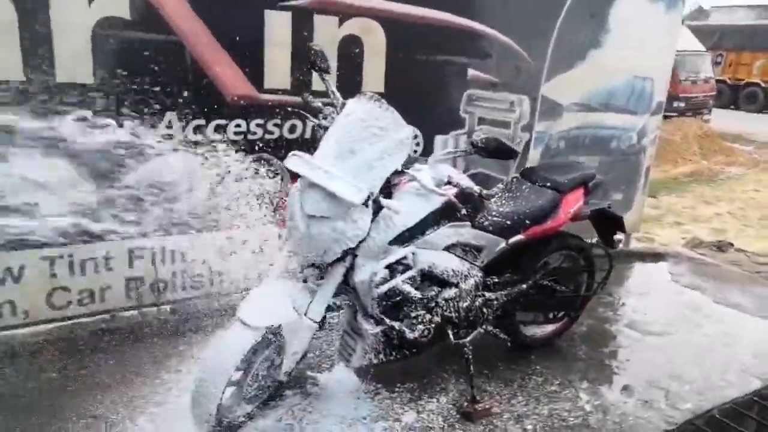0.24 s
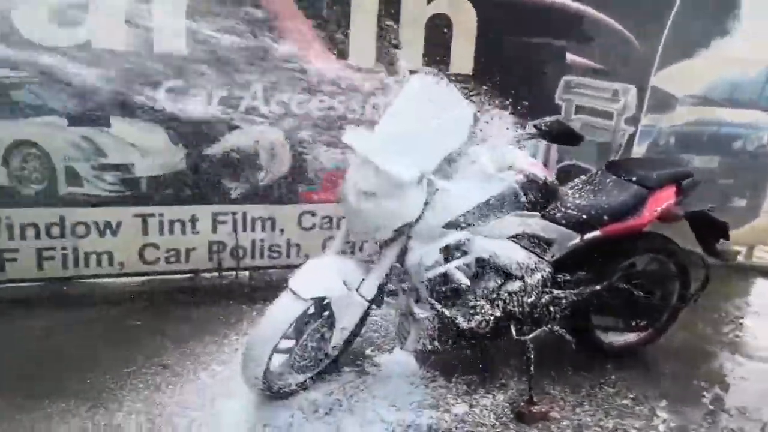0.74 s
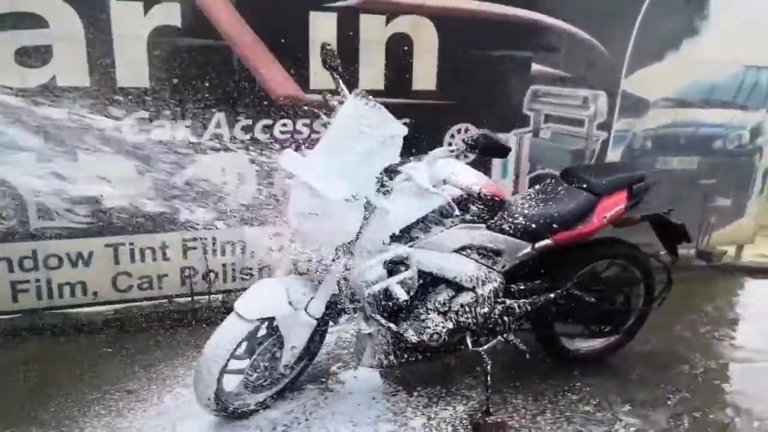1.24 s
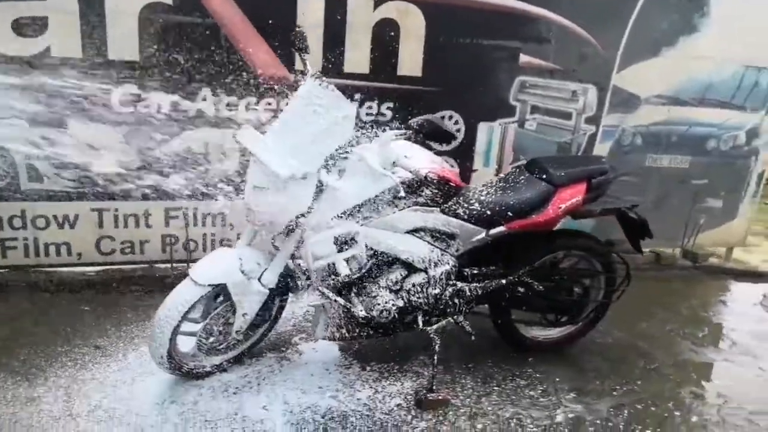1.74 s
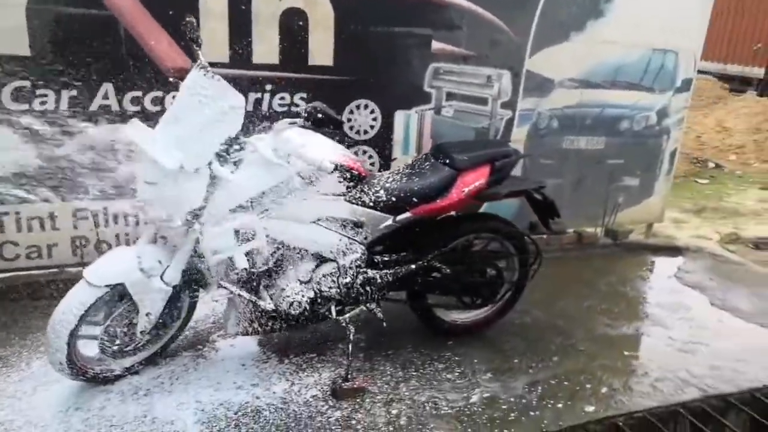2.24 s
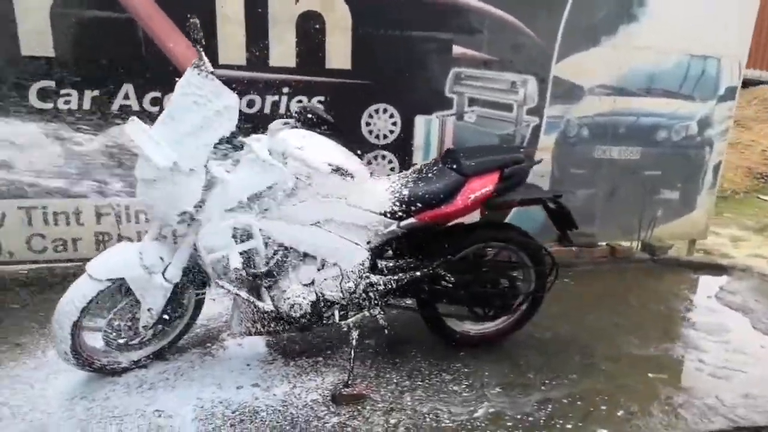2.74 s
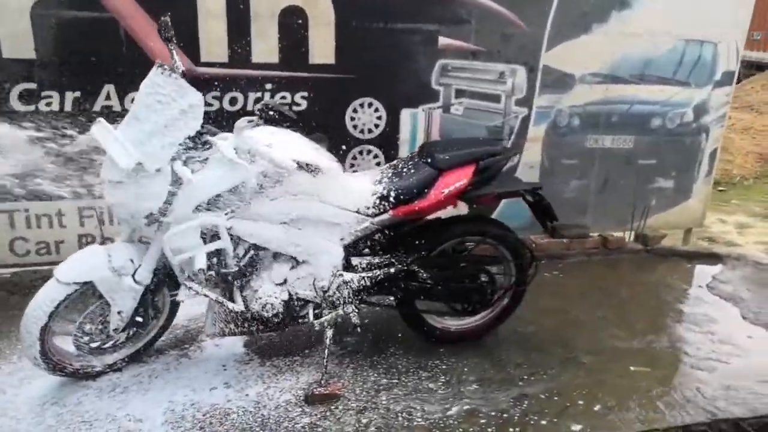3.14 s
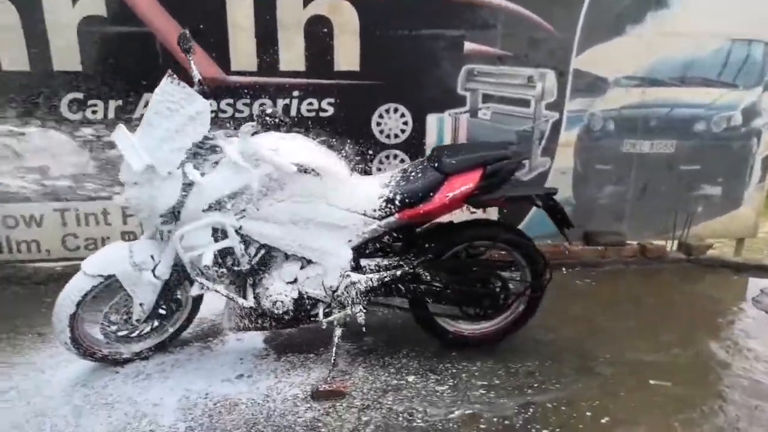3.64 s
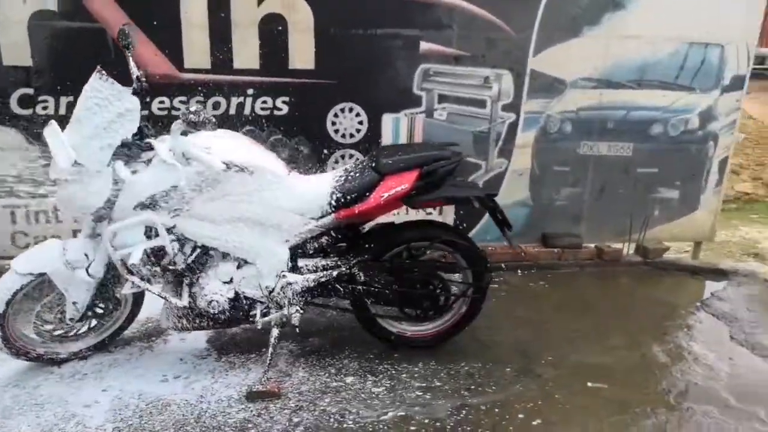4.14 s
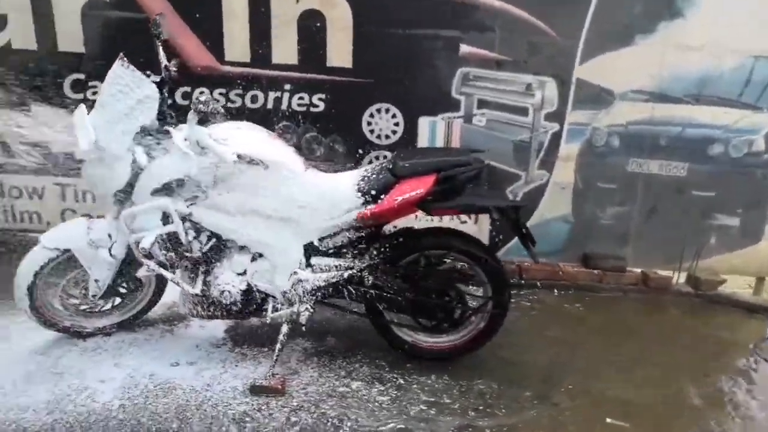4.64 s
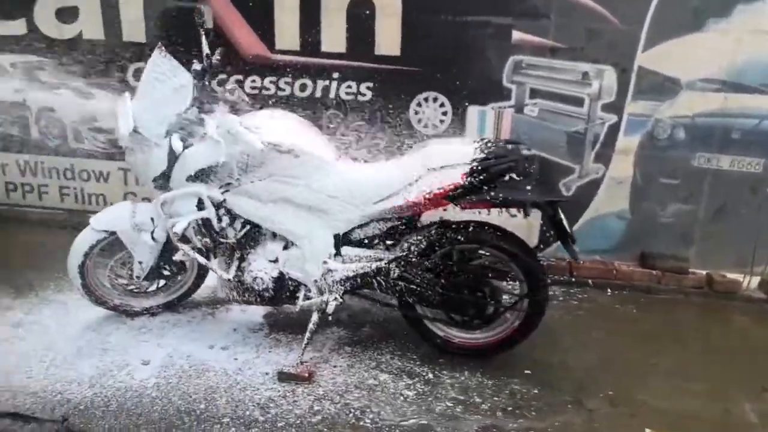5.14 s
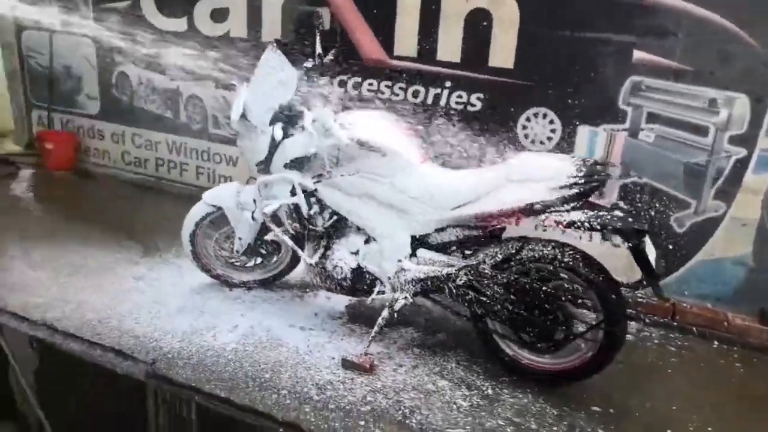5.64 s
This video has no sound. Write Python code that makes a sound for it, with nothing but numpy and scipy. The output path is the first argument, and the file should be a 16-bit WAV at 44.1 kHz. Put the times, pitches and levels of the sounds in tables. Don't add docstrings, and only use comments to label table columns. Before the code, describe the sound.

Close hand-held stereo capture of a pressurised foam jet outdoors beside a road. Steady noisy hiss and airy whistle start at full strength, with a dull knock on the phone almost immediately. The sound swings left at one second as the phone turns. Low engine hums and a thin brake squeal pass behind, then the spray eases, coloured by short echoes from wet ground, bodywork and wall, with crisp fizz drifting past.

```python
import sys
import numpy as np
from scipy import signal
from scipy.fft import rfft, irfft
from scipy.io import wavfile
from scipy.ndimage import uniform_filter1d, map_coordinates

SR = 44100
rng = np.random.default_rng(int(sys.argv[2]) if len(sys.argv) > 2 else 0)


def elevation(decibels):
    levels = np.asarray(decibels, float)
    return 10 ** (levels / 20)


def dump(signal):
    limited = np.clip(np.atleast_2d(signal).T, -1, 1)
    pcm = np.round(limited * 32767).astype(np.int16)
    wavfile.write(sys.argv[1], SR, pcm)


N = 260190
HZ, T = np.arange(N // 2 + 1) * SR / N, np.arange(N) / SR


def curve(points, hz):
    f, db = np.transpose(points)
    return np.interp(np.log(hz + 1), np.log(f), db)


def along(table):
    s, *columns = np.transpose(table)
    return [np.interp(T, s, c) for c in columns]


def unit(x):
    return x / np.sqrt(np.mean(x ** 2))


def smooth_twice(x, k):
    return uniform_filter1d(uniform_filter1d(x, k), k)


def walk(rate):
    k = int(SR / rate)
    held = np.repeat(rng.standard_normal(N // k + 1), k)
    return 0.62 * smooth_twice(held, k)[:N]


def late(x, ms):
    return map_coordinates(x, [np.arange(N) - ms * SR / 1000], order=3, mode="grid-wrap")


def bands(spectrum, centres):
    place = np.interp(np.log(HZ + 1), np.log(centres), np.arange(len(centres)))
    return [irfft(spectrum * np.clip(1 - abs(place - k), 0, 1), N) for k in range(len(centres))]


def notes(table, edge, steady, spread):
    out = np.zeros(N)
    for t0, t1, hz0, hz1, db in table:
        on = (T > t0) & (T < t1)
        k = int(SR / (spread * hz0) / 2)
        wobble = smooth_twice(rng.standard_normal((2, N)), k)
        wobble = steady + unit(wobble[0])[on] + 1j * unit(wobble[1])[on]
        glide = np.interp(T[on], [t0, t1], [hz0, hz1])
        carrier = np.exp(2j * np.pi * np.cumsum(glide) / SR)
        swell = np.clip(np.minimum(T[on] - t0, t1 - T[on]) / (edge * (t1 - t0)), 0, 1)
        out[on] += elevation(db) * swell * (wobble * carrier).real / np.sqrt(1 + steady ** 2 / 2)
    return out


# f/Hz, level/dB
TRAFFIC_COLOUR = [(12, -36), (20, -10), (60, -0.5), (135, -0.5), (285, -7), (479, -15.5), (520, -21),
                  (680, -29), (1140, -120)]


def rumble():
    mid, side = rfft(rng.standard_normal((2, N))) * elevation(curve(TRAFFIC_COLOUR, HZ)) * (HZ < 1500)
    side = side * np.clip(HZ / 560, .08, 1)
    centres = 25 * 2 ** np.arange(0, 5.5, .5)
    out = np.zeros((2, N))
    for m, d in zip(bands(mid, centres), bands(side, centres)):
        out += (m + d * np.array([[1], [-1]])) * elevation(2.5 * walk(2.6))
    return elevation(-37.5) * unit(out)


# start t/s, end t/s, start f/Hz, end f/Hz, level/dB
ENGINE_HUMS = [(.3, 1.35, 45.4, 43.8, -42), (.8, 1.4, 131, 145, -40), (.85, 1.2, 63, 68, -41),
               (1.42, 1.92, 71, 79, -37), (1.7, 2.1, 129, 128, -43), (.3, .8, 136, 133, -47),
               (.3, .75, 64, 68, -48), (2.05, 2.6, 105, 111, -40), (2.35, 2.9, 84, 87, -36.5),
               (2.3, 2.8, 135, 150, -45), (2.7, 3.2, 160, 145, -42), (2.95, 3.3, 76, 70, -40),
               (3.4, 3.75, 66, 58, -40), (4.3, 5.2, 50, 50.5, -44), (4.9, 5.7, 165, 143, -47),
               (1.0, 2.1, 295, 293, -51)]


def engines():
    return notes(ENGINE_HUMS, edge=0.2, steady=3.5, spread=.04)


# start t/s, end t/s, start f/Hz, end f/Hz, level/dB
BRAKE_SQUEALS = [
    (1.18, 1.45, 3980, 3950, -37),
    (1.75, 2.0, 3900, 4000, -37),
    (1.5, 1.9, 3735, 3725, -36),
    (1.8, 2.42, 3715, 3700, -28),
    (1.47, 1.52, 7000, 6980, -43),
    (1.74, 1.79, 7090, 7100, -44),
    (2.1, 2.3, 6980, 7050, -41),
]


def brake():
    squeal = notes(BRAKE_SQUEALS, edge=0.22, steady=0.7, spread=.013)
    return np.array([squeal, elevation(5.5) * late(squeal, 0.471)])


# onset t/s, rise t/s, fall t/s, peak level/dB
HAND_KNOCK = (.1522, .0018, .0027, -9.5)


def knock():
    t0, rise, fall, db = HAND_KNOCK
    ramp = np.clip((T - t0) / rise, 0, 1) ** 2
    release = np.exp(-(np.maximum(T - t0 - rise, 0) / fall) ** 1.1)
    push = signal.lfilter(*signal.butter(1, 9, "high", fs=SR), elevation(db) * ramp * release)
    return np.array([push, signal.lfilter(*signal.butter(1, 700, fs=SR), late(push, .25))])


# f/Hz, level/dB
MIST_SPECTRUM = [(6500, -5.5), (8180, -4.5), (8450, -3.5), (9600, -5.5), (10200, -10), (12000, -14.5),
                 (13500, -22), (15000, -24)]
# f/Hz, level/dB
MIST_RIGHT_SHADE = [(7500, 6.5), (8400, -14.5), (9700, -30), (11500, -18), (14500, -6)]
# middle t/s, half length t/s, right port level/dB, gain at the left level/dB
MIST_CLOUDS = [(0.02, 0.28, -54, -4), (.7, 0.53, -42.5, -0.5), (1.103, 0.17, -43, 1.5),
               (1.38, 0.16, -57, 1.5), (3.2, 0.37, -50, 0.5), (3.6, 0.44, -56, 0.5),
               (4.302, 0.22, -59, 3.5), (4.582, 0.15, -44, 2), (4.7, 0.17, -40, 3), (4.88, 0.16, -57, -1),
               (5.413, 0.35, -39.5, 1.5), (5.73, 0.32, -49, 0.5)]


def mist():
    left_db, right_floor_db = -44.5, -66
    cloud_edge = 0.42
    pops = rng.standard_normal((2, N)) * elevation(1.9 * rng.exponential(size=(2, N)))
    shade_db = np.array([0 * HZ, curve(MIST_RIGHT_SHADE, HZ)])
    spectrum = rfft(pops) * elevation(curve(MIST_SPECTRUM, HZ) + shade_db) * (HZ > 5000)
    centres = 6500 * 2 ** np.arange(0, 1.4, .2)
    fizz = sum(band * elevation(1.3 * walk(4.9)) for band in bands(spectrum, centres))
    gain_db = np.array([left_db + 0 * T, right_floor_db + 0 * T])
    for middle, length, right_db, left_gain_db in MIST_CLOUDS:
        passing = np.clip((1 - abs(T - middle) / length) / cloud_edge, 0, 1)
        gain_db[0] += left_gain_db * passing
        gain_db[1] = np.maximum(gain_db[1], right_floor_db + (right_db - right_floor_db) * passing)
    return unit(fizz) * elevation(gain_db + 3.0 + 0.58 * walk(33))


# f/Hz, level per Hz/dB
JET_SPECTRUM = [(500, -30.5), (620, -29), (800, -19.5), (1400, -22.5), (1650, -13), (2100, -14.5),
                (2600, -14.5), (3150, -19), (4000, -13), (4600, -15), (5300, -18), (6000, -25.5),
                (6350, -32), (7100, -27)]
# f/Hz, width f/Hz, level/dB
CHAMBER_MODES = [
    (1893, 180, 13),
    (611, 97, 6),
    (3950, 176, -5),
]


def turbulence():
    ring = 1 + sum(elevation(db) / (1 + (2 * (HZ - hz) / width) ** 2) for hz, width, db in CHAMBER_MODES)
    octaves_above = np.log2(np.maximum(HZ / JET_SPECTRUM[-1][0], 1))
    fall_db = -97 * octaves_above
    colour = elevation(curve(JET_SPECTRUM, HZ) + fall_db) * ring * np.clip(HZ / 480, 0, 1) ** 4
    colour = colour / np.sqrt(np.mean(colour ** 2))
    return rfft(rng.standard_normal((3, N))) * colour


# start t/s, end t/s, nearest delay/ms, further at the ends/ms, share (0-1)
FAIRING_PASS = (2, 4.7, 1.704, 0.23, 0.63)
# t/s, delay/ms, share (0-1)
HAND_ECHO = [(0, .27, .5), (.5, .21, .55), (.9, .172, .7), (1.2, .17, .4), (1.5, .3, .05), (2.4, .3, .3),
             (4.1, .24, .4), (4.8, .235, .35), (5.9, .24, .25)]


def surfaces(ground_ms):
    t0, t1, near_ms, far_ms, share = FAIRING_PASS
    facing = np.clip(1 - ((2 * T - t0 - t1) / (t1 - t0)) ** 2, 0, 1)
    ground_seen = np.clip((T - 1.05) / .4 + .5, 0, 1)
    tank_share = 0.18 * np.clip(1 - T / 7.1, 0, 1)
    left = [(1.2 * ground_ms, .4 * ground_seen),
            (ground_ms + 0.29, tank_share),
            (near_ms + far_ms * (1 - facing), share * facing)]
    ground_share = .38 * (1.1 - .07 * T) * ground_ms / .6
    return left, [(ground_ms, ground_share), along(HAND_ECHO)]


def glints(x, echoes, strength):
    return strength * sum(share * late(x, ms) for ms, share in echoes)


def bend(x, lag):
    long_waves = irfft(rfft(x) / (1 + (HZ / 2500) ** 8), N)
    side_on_ms, bent_share = .45, .55
    long_lag = lag + bent_share * np.maximum(side_on_ms - lag, 0)
    return late(x - long_waves, lag) + late(long_waves, long_lag)


# t/s, ground echo delay/ms, right port lag/ms
LANCE_POSE = [(0, 1.05, .5), (.45, .87, .445), (.8, .71, .44), (1.05, .52, .44), (1.9, .66, .455),
              (2.4, .62, .46), (3.0, .65, .45), (3.6, .58, .47), (4.4, .44, .49), (4.8, .46, .475),
              (5.1, .55, .39), (5.4, .7, .345), (5.9, .8, .29)]
# f/Hz, width f/Hz, level/dB
BEAM = (1800, 600, -5)


def arrivals():
    straight, left_wet, right_wet = turbulence()
    straight = irfft(straight, N)
    ground_ms, lag = along(LANCE_POSE)
    left_echoes, right_echoes = surfaces(ground_ms)
    wall_ms = np.maximum(6.7 - .4 * T, 4.9)
    wall_share = np.clip(.05 + .11 * T, .15, .5)
    bright = straight - .5 * late(straight, .11)
    walled = straight + wall_share * late(straight, wall_ms)
    left = walled + glints(bright, left_echoes, strength=.65)
    right = bend(walled + glints(bright, right_echoes, strength=1.0), lag)
    hz, width, db = BEAM
    beam_db = db / (1 + (2 * (HZ - hz) / width) ** 4)
    scatter = elevation(2.5 * np.log2(HZ / 2000 + .1) + beam_db)
    wet = elevation(-8.5 + .9 * T)
    return left + wet * irfft(left_wet * scatter, N), right + wet * irfft(right_wet * scatter, N)


# t/s, whistle level/dB, hiss left minus right level/dB (turn of the phone)
LANCE_PATH = [(0, -20.5, -2.5), (.25, -18.5, 0.5), (.5, -18.5, -2), (.8, -19.5, 1), (1.0, -21.5, 8.5),
              (1.25, -20, 2.5), (1.6, -21, 5), (2.2, -22.5, 3), (2.9, -22.5, 1), (3.4, -24.5, -0.5),
              (4.0, -25, 0), (4.6, -25.5, -2), (5.0, -26, -3.5), (5.45, -26, -1.5), (5.9, -26.5, -4.5)]
# f/Hz, level/dB
RIGHT_PORT_RESPONSE = [(400, 2), (620, -1), (800, -2), (1150, 2), (1900, 7), (2300, 13.5), (2700, 6.5),
                       (3450, 2), (4000, 0), (5200, 2), (6000, 6), (7200, -1.5)]
# f/Hz, lead/rad
RIGHT_PORT_PHASE = [(500, -.9), (860, -.1), (1300, .4), (2050, .65), (2350, -.3), (2600, -.7), (3450, -1.0),
                    (4200, 0)]


def jet():
    whistle_db, hiss_pan_db = along(LANCE_PATH)
    nearness_db = whistle_db + 22
    hiss_db, roar_db = -26.5 + 0.47 * nearness_db, -44.5 + 0.74 * nearness_db
    pan_db = hiss_pan_db + 3 + 1.32 * T
    left, right = arrivals()
    port = elevation(curve(RIGHT_PORT_RESPONSE, HZ)) * np.exp(1j * curve(RIGHT_PORT_PHASE, HZ))
    centres = 600 * 2 ** np.arange(0, 4, .25)
    pairs = zip(bands(rfft(left), centres), bands(rfft(right) * port, centres))
    out, surge, near = np.zeros((2, N)), walk(5), walk(3)
    for hz, pair in zip(centres, pairs):
        hiss = np.interp(np.log(hz), np.log([2400, 3300]), [0, 1])
        roar = np.interp(np.log(hz), np.log([1200, 1600]), [1, 0])
        db = whistle_db + hiss * (hiss_db - whistle_db + 6.5) + roar * (roar_db - whistle_db + 25.5) - 1
        pan = pan_db + hiss * (hiss_pan_db - pan_db) - 0.55 * roar * pan_db
        near = (near + walk(4.3)) / np.sqrt(2)
        flutter_db = 0.3 * surge + 0.8 * near + 0.9 * walk(9)
        for side, sign in enumerate((1, -1)):
            out[side] += pair[side] * elevation(db + sign * pan / 2 + flutter_db)
    return out


def scene():
    return rumble() + engines() + brake() + knock() + mist() + jet()


def band_limit(x):
    return signal.sosfilt(signal.butter(12, 15160, fs=SR, output="sos"), x)


def record(dry):
    return band_limit(dry)


dry = scene()
out = record(dry)
dump(out)
```